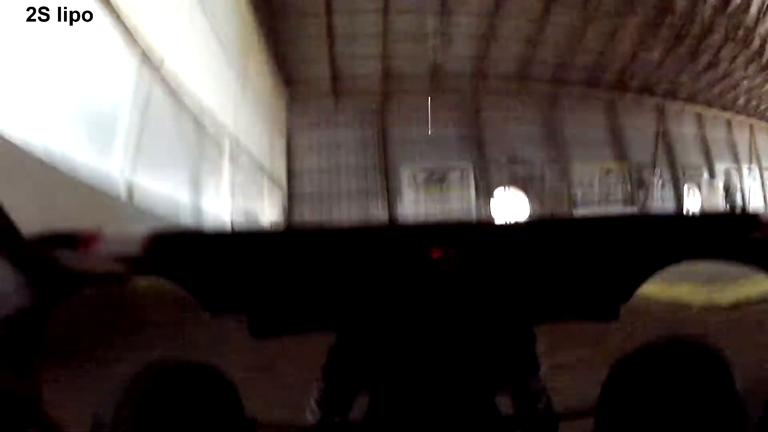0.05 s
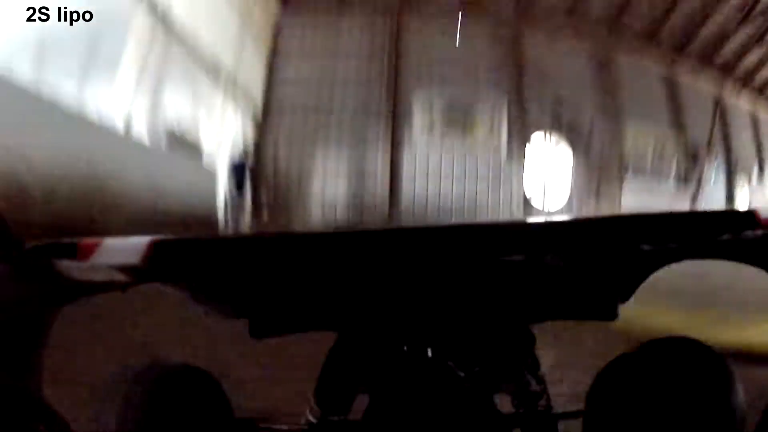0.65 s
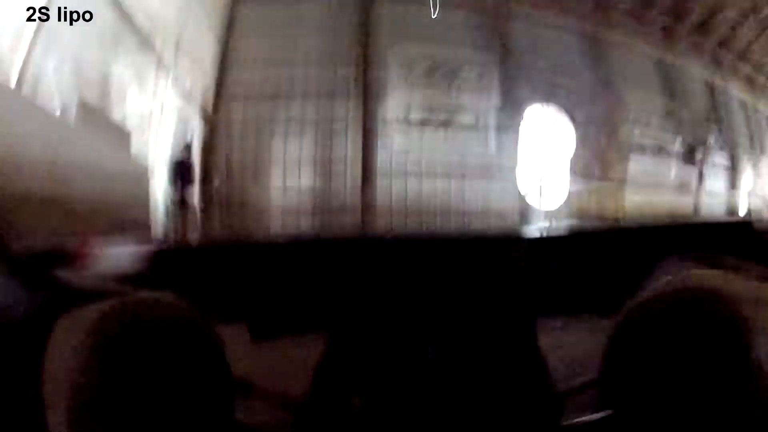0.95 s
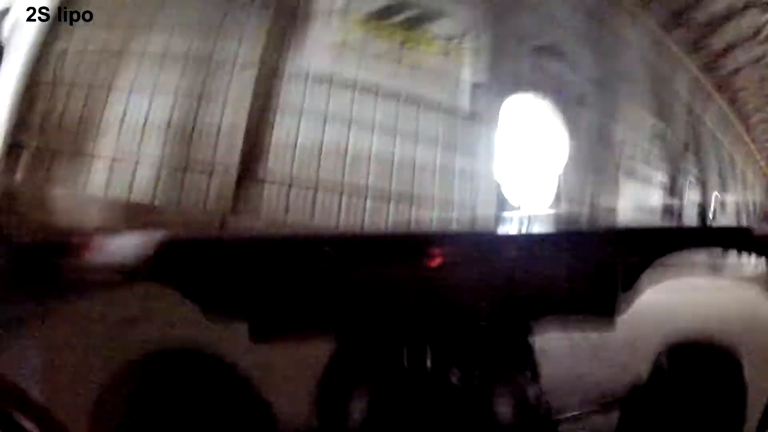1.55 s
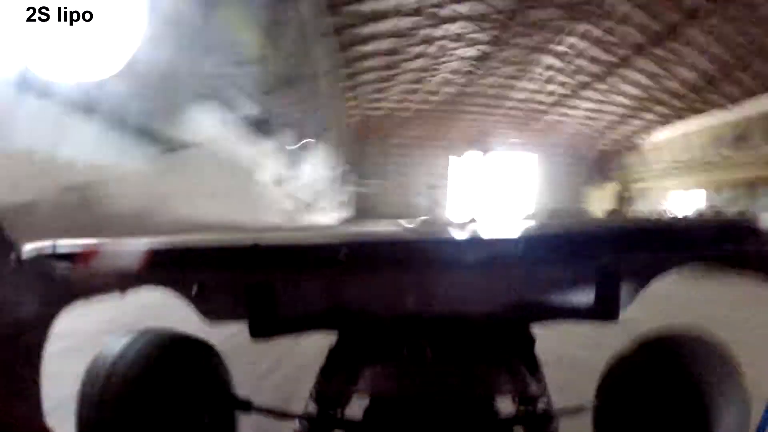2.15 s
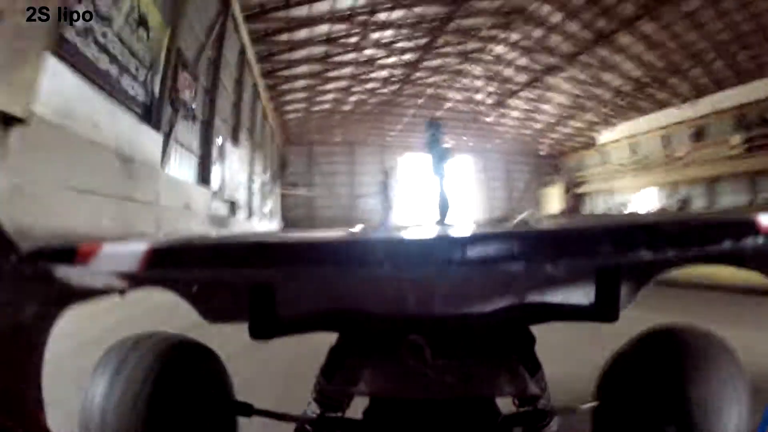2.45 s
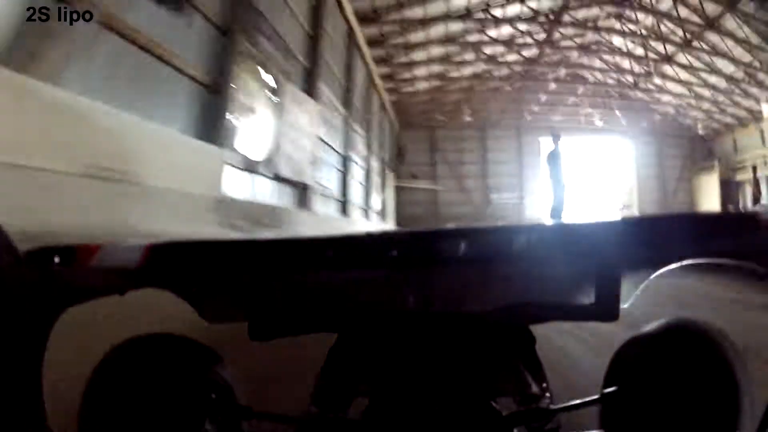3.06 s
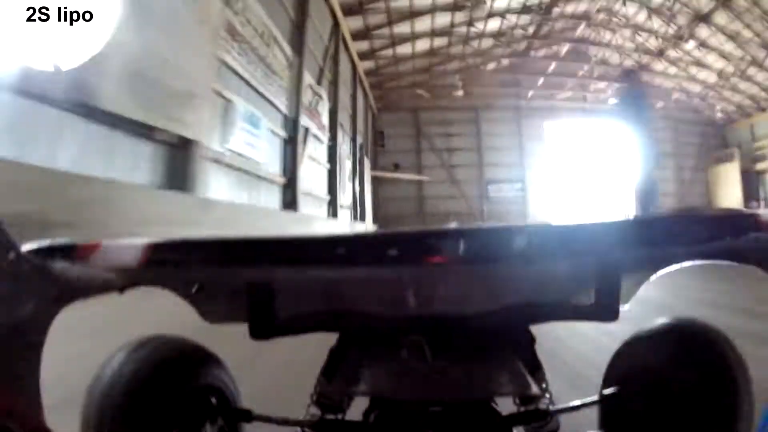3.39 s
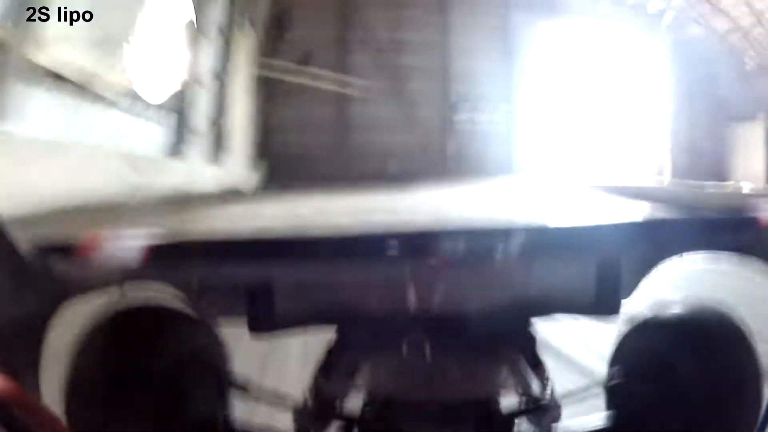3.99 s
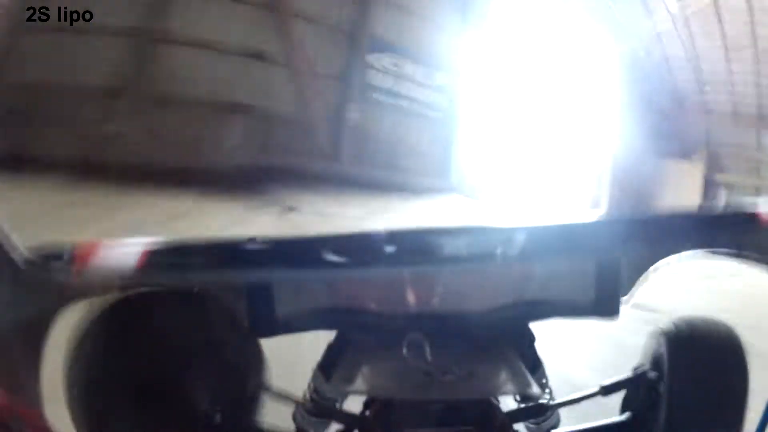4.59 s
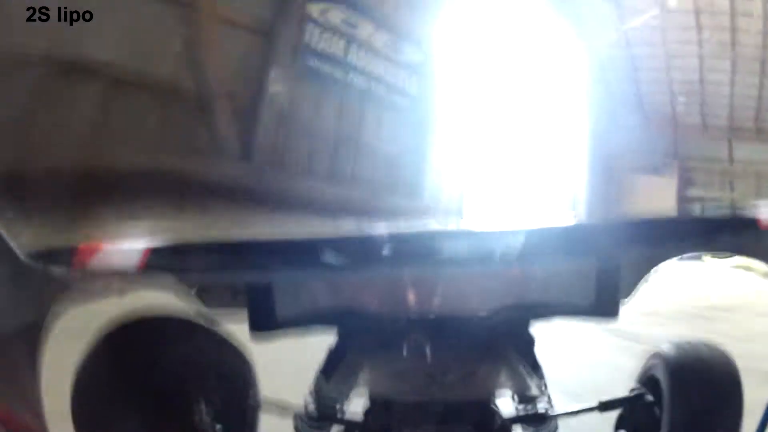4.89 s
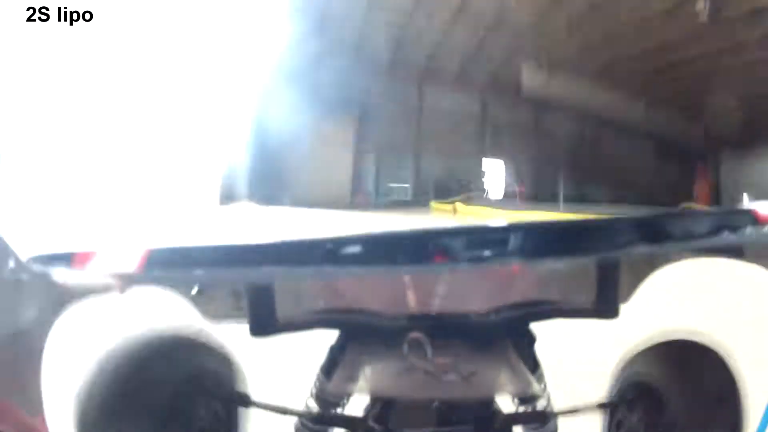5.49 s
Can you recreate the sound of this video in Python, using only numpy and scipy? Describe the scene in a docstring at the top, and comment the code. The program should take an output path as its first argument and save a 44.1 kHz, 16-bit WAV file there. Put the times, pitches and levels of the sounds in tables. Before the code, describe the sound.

Small electric motors whine up and down as a model truck races over dirt, with gritty gear rattle and knocks, heard from on board.

```python
"""Model truck racing in a barn

An electric model truck races over a dirt floor, heard from a small camera on its chassis (its frame).
Two geared motors whine, louder as they pull. Gears and tyres rattle through the camera case, the truck
lands from jumps and its wheels hop in a tight turn. The camera holds each sample at a low rate, which
mirrors the whole sound into a gritty treble."""
import sys
import numpy as np
from scipy import signal
from scipy.fft import rfft, irfft
from scipy.io import wavfile
from scipy.ndimage import uniform_filter1d

SR = 44100
rng = np.random.default_rng(int(sys.argv[2]) if len(sys.argv) > 2 else 0)


def dump(signal):
    """Clip the signal to [-1, 1] and save it as 16-bit WAV at the path in sys.argv[1]."""
    limited = np.clip(np.atleast_2d(signal).T, -1, 1)
    pcm = np.round(limited * 32767).astype(np.int16)
    wavfile.write(sys.argv[1], SR, pcm)


N = 248724
TIME = np.arange(N) / SR
BINS = np.maximum(np.arange(N // 2 + 1) * SR / N, 1)   # the frequencies of a spectrum, in Hz


def from_db(db):
    """Turn decibels (dB) into a factor to multiply by."""
    return 10 ** (np.asarray(db) / 20)


def unit_power(x):
    """Scale a signal so that its average power is 1."""
    return x / np.sqrt(np.mean(x ** 2) + 1e-20)


def in_time(rows):
    """Join (seconds, value) points with straight lines."""
    seconds, values = np.transpose(rows)
    return np.interp(TIME, np.sort(seconds), values)


def spectrum(points):
    """Join (Hz, dB) points into a gain for every frequency."""
    hz, db = np.transpose(points)
    return from_db(np.interp(np.log(BINS), np.log(hz), db))


def colour(x, gain):
    """Filter by a gain for every frequency, so that ringing follows each hit (minimum phase)."""
    cepstrum = irfft(np.log(gain + 1e-6), N)
    cepstrum[1:N // 2] *= 2
    cepstrum[N // 2 + 1:] = 0
    return irfft(rfft(x) * np.exp(rfft(cepstrum)), N)


def drift(rate_hz, centre_hz=0):
    """A random wobble of size about 1, swinging at roughly centre_hz if that is given."""
    size, step = 16384, 16
    hz = np.arange(size // 2 + 1) * SR / step / size
    slow = irfft(rfft(rng.standard_normal(size)) / (1 + ((hz - centre_hz) / rate_hz) ** 2))
    return np.interp(np.arange(N) / step, np.arange(size), unit_power(slow))


def grains(per_s, spread_db=1.5):
    """Random clicks of uneven size."""
    sizes = from_db(spread_db * np.minimum(rng.exponential(1, N), 4)) * rng.choice([-1, 1], N)
    return sizes * (rng.random(N) < per_s / SR)


def case_gain(bass_db=-25, bass_edge_hz=1500):
    """The plastic case passes the pitches it rings at (its resonances) and a little bass."""
    # The case's resonances. Each row: frequency in Hz, width in Hz, level in dB.
    peaks = [(480, 89, -8), (785, 173, -1.5), (913.6, 221, 2), (1283, 360, 2.5), (1573, 238, 2.5),
             (1754, 450, -1), (2035, 220, 0), (2570, 230, -7), (2870, 754, -4.5), (3463, 600, -11),
             (4030, 270, -20), (4860, 1500, -22)]
    # Dips where neighbouring resonances cancel. Each row: frequency in Hz, width in Hz, depth in dB.
    dips = [(308, 160, -1.5), (625, 69, -8)]
    power = sum(from_db(db) ** 2 / (1 + (2 * (BINS - hz) / width) ** 2) ** 3 for hz, width, db in peaks)
    bass = from_db(bass_db) ** 2 / (1 + (BINS / bass_edge_hz) ** 8)
    dips_db = sum(db * np.exp(-(2 * (BINS - hz) / width) ** 2) for hz, width, db in dips)
    return np.sqrt(power + bass) * from_db(dips_db)


def tone(speed, multiple, case, rough, blur_hz):
    """A tone at a multiple of the turn rate, roughened by uneven contact, louder where the case rings."""
    hz = speed * multiple
    phase = 2 * np.pi * (np.cumsum(hz) / SR + rng.random())
    wave = (1 + rough * drift(blur_hz)) * np.sin(phase) + rough * drift(blur_hz) * np.cos(phase)
    return wave / np.sqrt(.5 + rough ** 2) * np.interp(hz, BINS, case)


def pull_db(speed, lag_s=0.016, strong_turns_per_s2=220, limit_db=2):
    """After a short lag, a motor is louder while it speeds up and quieter while it slows."""
    keep = np.exp(-1 / (lag_s * SR))
    acceleration = signal.lfilter([1 - keep], [1, -keep], np.gradient(speed) * SR)
    return limit_db * np.tanh(acceleration / strong_turns_per_s2)


def motor(speed, level_db, case, shaken, pulses_per_turn=3):
    """The motor's rotating switch pulses into a whine; imbalance and uneven poles add weaker tones."""
    # The weaker tones. Each row: multiple of the turn rate, level in dB against the main whine.
    overtones = [(1, -12), (2, -34), (4, -17.5), (5, -28), (6, -7), (8, -18), (9, -8), (10, -19)]
    whine = tone(speed, pulses_per_turn, case, rough=0.18 + 0.23 * shaken, blur_hz=50.5)
    jitter = 0.087 + 0.13 * shaken   # small timing errors, which blur higher multiples more
    others = sum(from_db(db) * tone(speed, k, case, k * jitter, blur_hz=104) for k, db in overtones)
    return from_db(level_db) * (whine + others)


def gears(speed, level_db, case, shaken, teeth=13, octave_db=-11, rasp_db=-12):
    """A small gear sings, rougher when shaken; its wobble adds a rasp just above and below its pitch."""
    rough = 0.21 + 0.94 * shaken
    singing = tone(speed, teeth, case, rough, blur_hz=210)
    octave = from_db(octave_db) * tone(speed, 2 * teeth, case, 2 * rough, blur_hz=110)
    rasp = sum(tone(speed, k, case, rough=0.66, blur_hz=197) for k in (teeth - 1, teeth + 1))
    return from_db(level_db) * (singing + octave + from_db(rasp_db) * speed / np.mean(speed) * rasp)


def mount_hum(speed, level_db=-38.5, mount_hz=198, width_hz=100):
    """An unbalanced motor shakes its mount most when it turns at the rate the mount rings at."""
    swell = 1 / (1 + (2 * (speed - mount_hz) / width_hz) ** 2) ** 2
    return from_db(level_db + 2.8 * drift(5.7)) * swell * np.sin(2 * np.pi * np.cumsum(speed) / SR)


def rattle(level_db, case):
    """Loose gear teeth and joints chatter and make the case ring."""
    # What the rattle feeds into the case. Each row: frequency in Hz, relative level in dB.
    shape = [(60, 3), (200, 7.5), (330, -1.5), (480, -3.5), (630, -2.5), (780, 0), (1300, -5.5), (2000, 5),
             (3000, -7.5), (5500, -7)]
    return from_db(level_db) * unit_power(colour(grains(per_s=6000), case * spectrum(shape)))


def tyre_grit(speed, cruise_db, cruise_turns_per_s=240, doubling_db=3):
    """The tyres throw up grit, louder the faster they spin."""
    # The tone colour of the grit. Each row: frequency in Hz, relative level in dB.
    shape = [(500, -45), (2000, 11), (2900, 2), (3900, -3), (5000, -10.5), (5900, -15)]
    level_db = cruise_db + doubling_db * np.log2(speed / cruise_turns_per_s)
    return from_db(level_db) * unit_power(colour(grains(per_s=6000), spectrum(shape)))


def chassis_rumble(level_db):
    """Uneven ground shakes the chassis into a deep noise."""
    # The tone colour of the rumble. Each row: frequency in Hz, relative level in dB.
    shape = [(12, -15.5), (27, 6), (40, -2), (70, -13.5), (130, -15.5), (200, -17.5), (300, -28),
             (500, -22), (900, -46), (3000, -98)]
    return from_db(level_db) * unit_power(colour(rng.standard_normal(N), spectrum(shape)))


def clods(case, shaken, per_s=55, decay_s=0.0056, level_db=-31):
    """On rough ground, lumps of dirt fly off the tyres and crumble against the chassis."""
    hits = signal.lfilter([1], [1, -np.exp(-1 / (decay_s * SR))], np.abs(grains(per_s)))
    crumbling = colour(hits * rng.standard_normal(N), case * np.sqrt(BINS))
    return from_db(level_db) * shaken * unit_power(crumbling)


def tyre_bites(grip_s=.013, release_s=.009, hard_db=12, hard_slowdown=.17, lag_s=.006):
    """A hopping tyre bites the ground, loading the drive and, a moment later, slowing the motor."""
    # The bites. Each row: time of the peak in seconds, surge of load in dB.
    bites = [(0.281, 8), (.322, 9), (.973, 7), (1.638, 12), (1.677, 7), (1.714, 15), (1.767, 12),
             (1.805, 12.5), (1.850, 12.5), (1.888, 7), (1.928, 14), (1.967, 11.5), (2.047, 2), (2.085, 4),
             (2.118, 5), (2.224, 2), (3.836, 13), (5.405, 3), (5.50, 4)]
    load_db = sum(db * np.exp(-((TIME - s) / np.where(TIME < s, grip_s, release_s)) ** 2)
                  for s, db in bites)
    speed_factor = 1 - hard_slowdown * np.interp(TIME - lag_s, TIME, load_db) / hard_db
    return load_db, speed_factor


def landings():
    """The tyres thud on the ground and the chassis bottoms out with a knock."""
    # The landings. Each row: start in seconds, thud level in dB, knock level in dB.
    blows = [(.357, -15.5, -12), (.561, -26.5, -37), (.873, -14, -18.5), (.941, -18, -24),
             (.946, -14.5, -12.5), (1.463, -13, -18), (1.567, -14.5, -20.5), (1.600, -31, -18)]
    # How the chassis rings. Each row: frequency in Hz, relative level in dB, seconds to fade by 60 dB.
    resonances = [(62, -3.5, 0.042), (117, -1, 0.05), (174, -1, 0.053), (462, -5.5, 0.026), (727, 4, 0.023)]
    start_s, thud_db, knock_db = np.transpose(blows)
    out = np.zeros(N)
    for (hz, db, fade_s), blow_db in zip(resonances, [thud_db] * 3 + [knock_db] * 2):
        clicks = np.zeros(N)
        clicks[(start_s * SR).astype(int)] = from_db(blow_db + db + rng.normal(0, 1, len(start_s)))
        keep = np.exp(-np.log(1000) / (fade_s * SR))
        angle = 2 * np.pi * hz / SR
        out -= signal.lfilter([0, np.sin(angle)], [1, -2 * keep * np.cos(angle), keep ** 2],
                              clicks + 1e-18)
    return out


def clacks(case, decay_s=0.0061, level_db=-4.5):
    """Suspension links hit their stops in a short burst of contacts."""
    # The clacks. Each row: start in seconds, relative peak level in dB.
    hits = [(.7074, -7.5), (0.8222, -10.5), (1.3709, -15), (1.447, -9), (1.5449, -8), (3.7937, -12.5),
            (4.0521, -8), (4.1122, -12), (4.128, -11.5), (4.2466, -9), (4.2612, -9.5), (4.514, -8.5),
            (5.2226, -11), (5.3372, -11)]
    bursts = sum(from_db(db + level_db) * (TIME >= s) * np.exp(-np.abs(TIME - s) / decay_s)
                 for s, db in hits)
    return colour(rng.standard_normal(N) * bursts, case) / np.sqrt(np.mean(case ** 2))


def scene():
    """Motors, rattle, grit and bumps, all carried to the camera by the chassis."""
    # Motor speeds. Each row: time in seconds, turns per second.
    rear_turns = [(0, 138), (.12, 165), (.2, 220), (.31, 270), (.38, 114), (.55, 151), (.62, 138),
                  (.8, 218), (.93, 214), (.97, 158), (1.25, 157), (1.46, 222), (1.61, 147.6), (2, 151),
                  (2.1, 217), (2.19, 222), (2.24, 250), (2.32, 318), (2.4, 312), (2.48, 229), (2.62, 206),
                  (3.1, 299), (3.24, 376), (3.55, 380), (3.68, 420), (3.83, 300), (3.87, 155), (3.93, 94),
                  (3.99, 115), (4.08, 235), (4.35, 252), (4.65, 195), (4.8, 249), (4.87, 227), (5.03, 242),
                  (5.1, 221), (5.3, 192), (5.54, 328), (5.64, 250)]
    front_turns = [(0, 152), (.1, 162), (.2, 254), (.33, 300), (.375, 168), (.58, 157), (.85, 205),
                   (.97, 164), (1.24, 158), (1.45, 205), (1.6, 160), (1.98, 150), (2.08, 244), (2.23, 273),
                   (2.3, 384), (2.41, 390), (2.48, 280), (2.64, 225), (2.8, 276), (3.16, 335), (3.24, 432),
                   (3.45, 434), (3.77, 415), (3.84, 285), (4.06, 262), (4.4, 258), (4.66, 224), (4.8, 265),
                   (4.93, 243), (5.05, 254), (5.34, 225), (5.53, 356), (5.64, 320)]   # spins up as the nose lifts
    # Loudness over time. Each row: time in seconds, relative level in dB.
    torque_levels = [(0, -12), (.2, 5), (.3, -2.5), (.45, 0), (.66, -0.5), (.77, -2), (.95, 1), (1.05, -9),
                     (1.33, 1.5), (1.52, -3), (1.63, -2.5), (1.76, -13.5), (2, -11.5), (2.1, -0.5),
                     (2.38, 1.5), (2.5, -0.5), (2.76, 1.5), (3.1, 0), (3.44, 2), (3.5, -3), (3.6, -1.5),
                     (3.77, -12), (3.835, 0), (3.9, -11), (4.15, -5.5), (4.6, 4), (4.76, 4), (4.88, -4),
                     (5.04, 5), (5.13, -4), (5.41, 2.5), (5.48, -2), (5.64, 1)]   # the whine, high when the motors work hard
    gear_levels = [(0, -39), (.2, -32), (.45, -48), (.58, -22.5), (.8, -34), (.98, -24), (1.2, -32.5),
                   (1.5, -35), (1.7, -30), (1.98, -32), (2.08, -24), (2.35, -22), (2.47, -29), (2.64, -33),
                   (2.76, -25), (3.2, -27), (3.8, -34), (3.89, -18), (3.96, -36.5), (4.55, -36),
                   (4.74, -23), (4.88, -33), (5.02, -26), (5.15, -37), (5.4, -25.5), (5.64, -26)]   # high when the teeth are pressed together
    rattle_levels = [(0, -31.5), (.12, -18), (.26, -20.5), (.3, -29), (.41, -26), (.5, -23.5), (.82, -19),
                     (1.0, -24.5), (1.07, -20), (1.2, -24), (1.37, -18), (1.62, -23.5), (1.74, -35.5),
                     (1.96, -34), (2.01, -23), (2.2, -22.5), (2.45, -22), (2.74, -20.5), (3.25, -24.5),
                     (3.72, -22.5), (3.77, -27), (3.86, -27), (3.97, -35), (4.1, -21.5), (4.75, -20),
                     (4.87, -23), (4.97, -20), (5.64, -21.5)]   # low while the load is off the tyres
    rumble_levels = [(0.0, -34), (0.05, -35), (0.23, -53), (0.36, -27), (0.52, -31), (0.75, -48),
                     (0.83, -42), (0.88, -19.5), (1.05, -39), (1.43, -39), (1.46, -21.5), (1.65, -26),
                     (1.85, -47), (2.12, -34.5), (2.4, -50), (2.5, -41), (2.62, -43.5), (3.66, -48),
                     (4.15, -27), (4.52, -32.5), (5.12, -36), (5.26, -29), (5.51, -46), (5.64, -42)]   # high on rough ground
    rear_speed, front_speed = in_time(rear_turns), in_time(front_turns)
    torque_db, gear_db = in_time(torque_levels), in_time(gear_levels)
    rattle_db, rumble_db = in_time(rattle_levels), in_time(rumble_levels)
    case = case_gain()
    bite_db, bite_slowing = tyre_bites()
    rear_pull_db = pull_db(rear_speed)
    rear_db = -26.5 + torque_db + rear_pull_db + 0.6 * bite_db
    front_db = -28.5 + torque_db + pull_db(front_speed) + 1.66 * drift(13)
    # Rough ground taken at speed shakes the drive: 0 is smooth, 1 is hard.
    rough_ground = np.interp(rumble_db, [-38, -30], [0, 1])
    going_fast = np.interp(rear_speed, [145, 210], [0, 1])
    shaken = uniform_filter1d(rough_ground * going_fast, SR // 8)
    # The axles judder on their tyres, which varies the load and the speed.
    judder = drift(6.9, centre_hz=25.5)
    load = from_db(1.01 * judder + 0.75 * drift(23, centre_hz=49.6))
    wobble = -(0.011 + 0.0083 * shaken) * judder + 0.004954 * drift(59) + 0.00601 * drift(5.98)
    rear_speed = rear_speed * bite_slowing * (1 + wobble)
    front_speed = front_speed * (1 + 0.00802 * drift(35.4))
    whine = motor(rear_speed, rear_db, case, shaken) + motor(front_speed, front_db, case, shaken)
    singing = gears(rear_speed, gear_db + rear_pull_db + .9 * bite_db + 1.2 * drift(20), case, shaken)
    chatter = rattle(rattle_db - 3.5 + 0.77 * bite_db, case)
    grit = tyre_grit(rear_speed, rattle_db - 12 + 0.9 * bite_db)
    rumble = chassis_rumble(rumble_db + 0.2)
    bumps = clods(case, shaken) + clacks(case) + landings()
    return (load * (whine + singing + chatter + grit) + mount_hum(rear_speed) + rumble + bumps)[None]


def record(dry, hold_hz=12000, repeats=4, cutoff_hz=15450):
    """The camera holds each slow sample, mirroring the sound around the hold rate, then cuts the top."""
    slow = signal.resample_poly(dry, hold_hz, SR, axis=-1)
    steps = np.repeat(slow, repeats, axis=-1)
    held = signal.resample_poly(steps, SR, repeats * hold_hz, axis=-1)[:, :N]
    lowpass = signal.firwin(301, cutoff_hz, fs=SR, window="blackman")
    return signal.fftconvolve(held, lowpass[None], "same")


dry = scene()
out = record(dry)
dump(out)
```